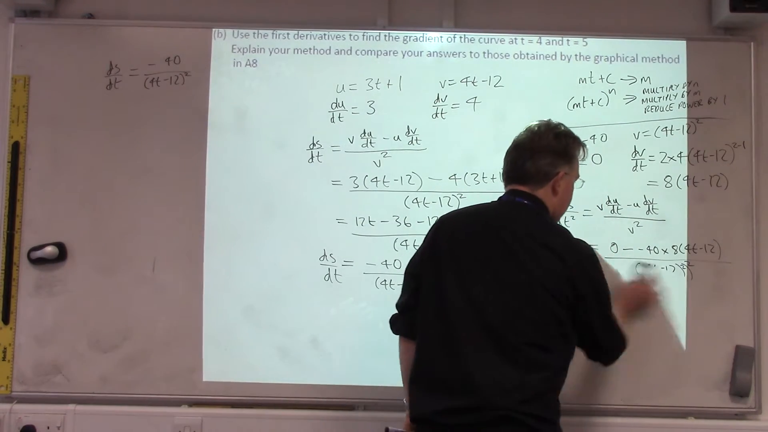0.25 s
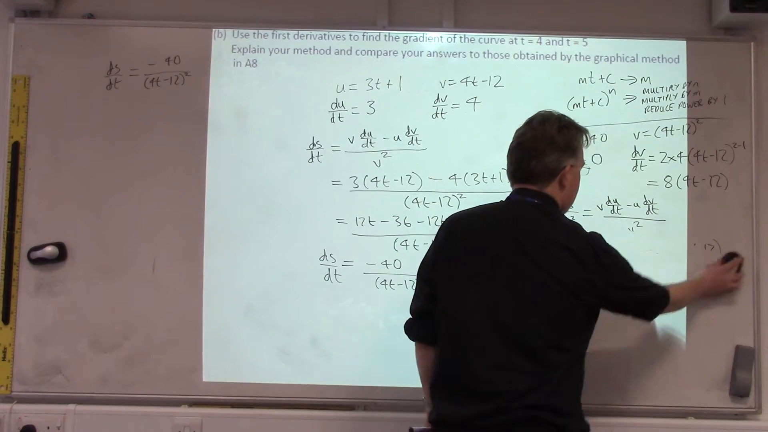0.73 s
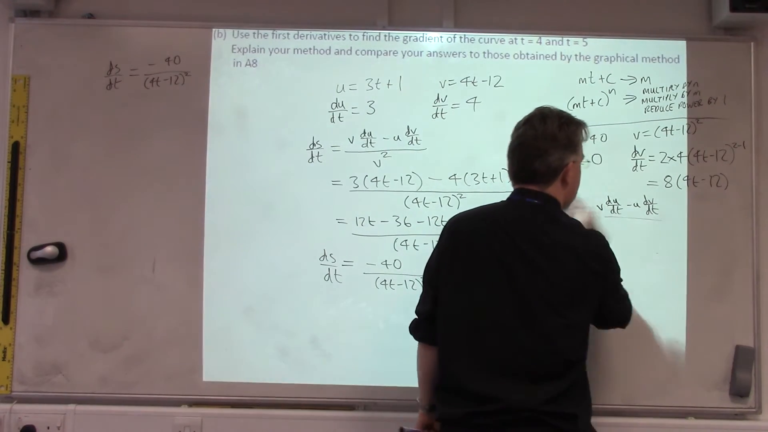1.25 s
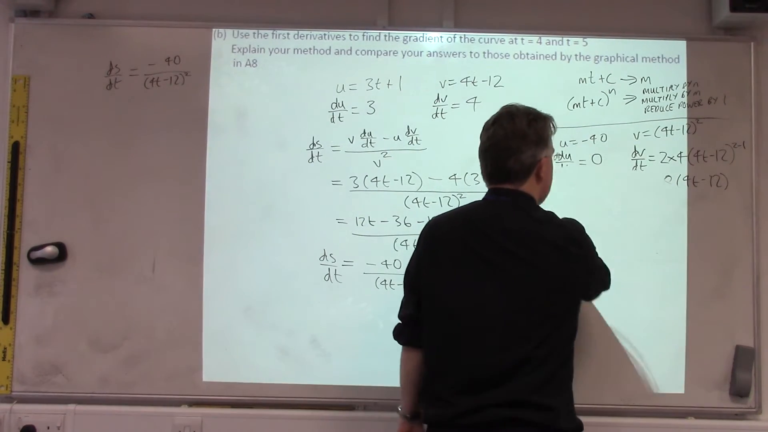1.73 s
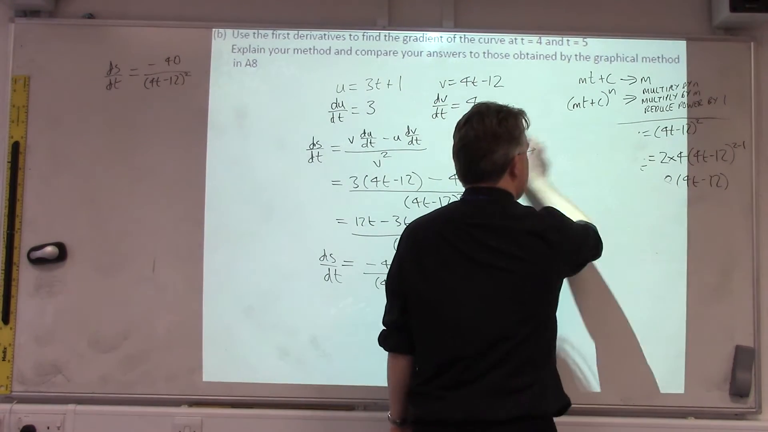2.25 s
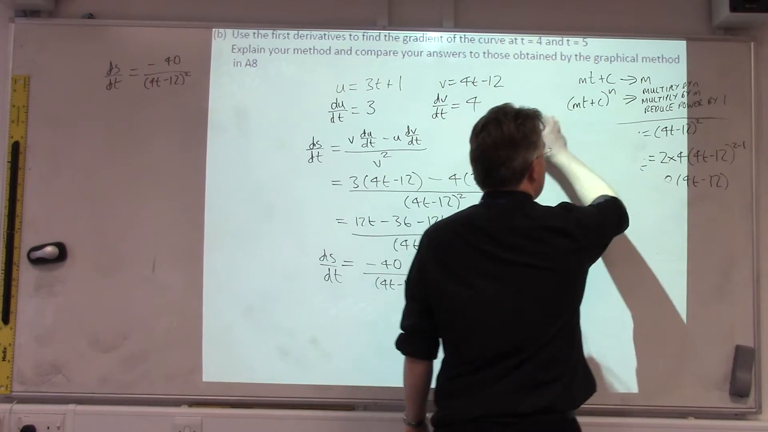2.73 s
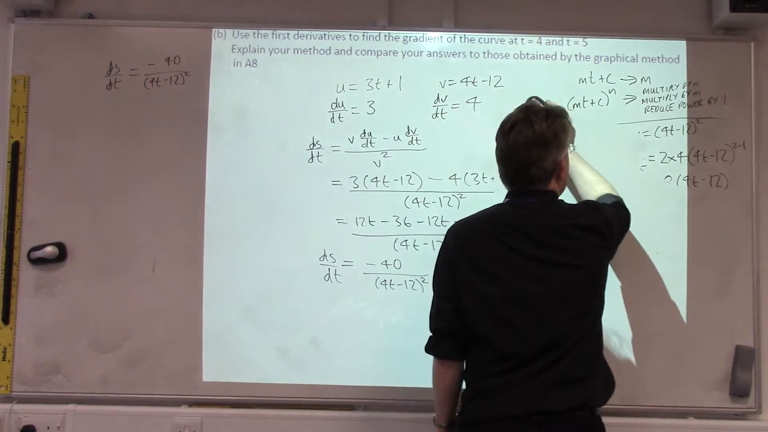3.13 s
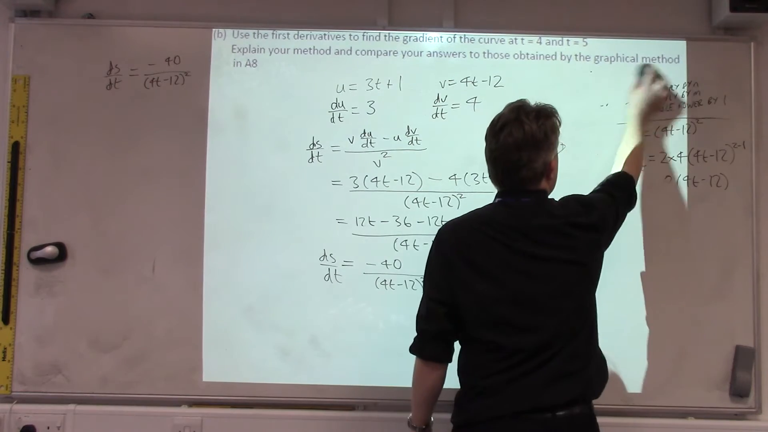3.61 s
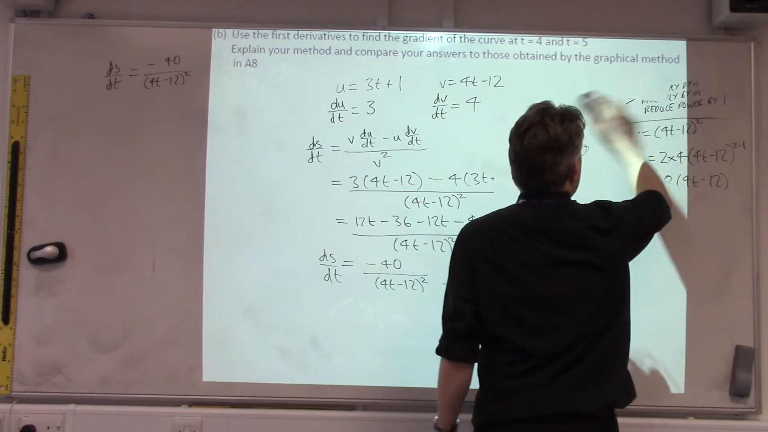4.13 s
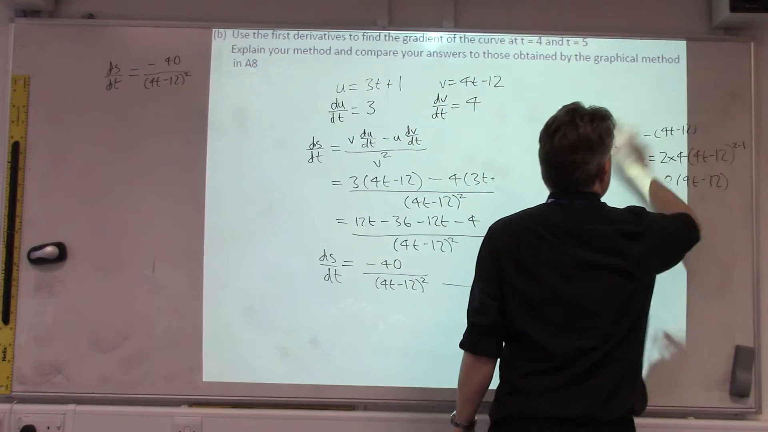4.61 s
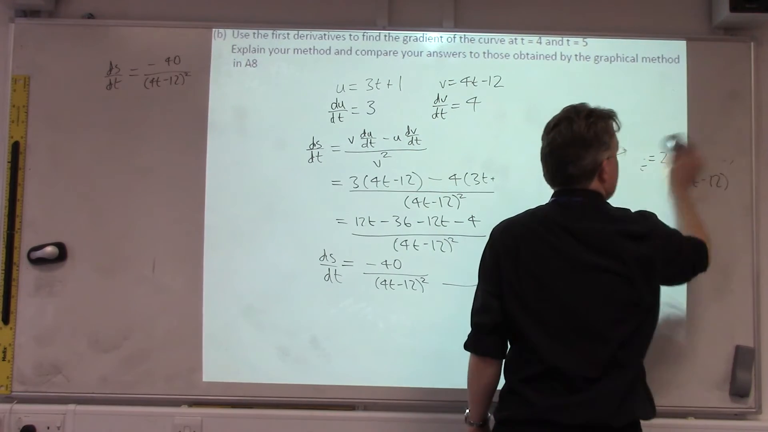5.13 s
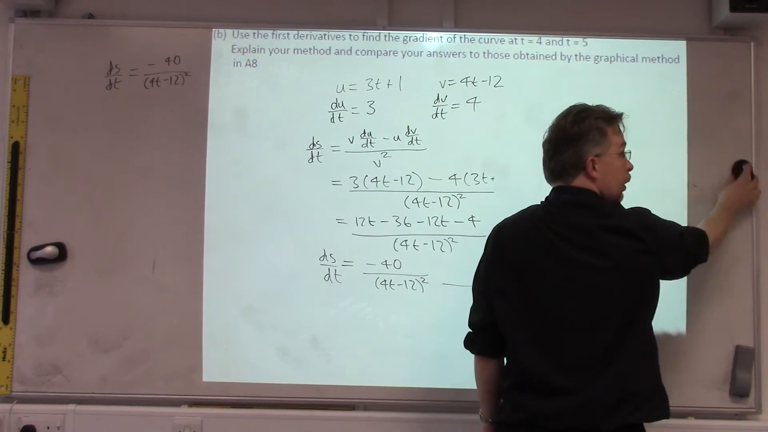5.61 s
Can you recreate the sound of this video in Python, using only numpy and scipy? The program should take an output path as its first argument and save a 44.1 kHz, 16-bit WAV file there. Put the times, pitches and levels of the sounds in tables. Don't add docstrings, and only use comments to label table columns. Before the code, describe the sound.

Quick, airy swishes of an eraser on a loose board in a classroom, low panel rumble beneath, and two small clacks against the surface.

```python
import sys
import numpy as np
from scipy import signal
from scipy.fft import rfft, irfft
from scipy.io import wavfile
from scipy.ndimage import uniform_filter1d

SR = 44100
rng = np.random.default_rng(int(sys.argv[2]) if len(sys.argv) > 2 else 0)


def unload_audio(sound):
    columns = np.transpose(np.atleast_2d(sound))
    steps = np.round(np.clip(columns, -1, 1) * 32767)
    wavfile.write(sys.argv[1], SR, steps.astype(np.int16))


def level_to_linear(level):
    exponent = np.asarray(level, float) / 20
    return 10 ** exponent


N = 258426


def evened(x):
    return x / np.sqrt(np.mean(x ** 2) + 1e-20)


def read(points, hz):
    f, value = np.transpose(points)
    return np.interp(np.log(hz + 1), np.log(f + 1), value)


def curves(rows):
    s, *columns = np.transpose(rows)
    return [np.interp(np.arange(N) / SR, s, column) for column in columns]


def add(mix, s, sound):
    part = mix[round(s * SR):][:len(sound)]
    part += sound[:len(part)]


def resonate(x, hz, width):
    turn = np.exp(2j * np.pi * np.cumsum(hz * np.ones(len(x))) / SR)
    r = np.exp(-np.pi * width / SR)
    return 2 * (turn * signal.lfilter([1 - r], [1, -r], x / turn)).real


def resonate_twice(x, hz, width):
    return resonate(resonate(x, hz, width), hz, width)


def drift(seconds):
    size = int(seconds * SR) + 1
    return evened(uniform_filter1d(uniform_filter1d(rng.standard_normal(N), size), size))


def noise(spectrum, patchy_db):
    hz = np.fft.rfftfreq(1024, 1 / SR)
    real, imag, patches = rng.standard_normal((N // 256 + 5, 513, 3)).T
    patches = uniform_filter1d(patches, size=8, axis=0)
    patches = evened(uniform_filter1d(patches, size=12, axis=1))
    z = (real + 1j * imag) * level_to_linear(read(spectrum, hz)[:, None] + patchy_db * patches)
    return evened(signal.istft(z, nperseg=1024, noverlap=768)[1][:N])


# f/Hz, level/(dB per Hz)
AIR = [(18, -50), (30, -17), (108, -25.5), (208, -1.5), (284, 2.5), (444, -3.5), (519, -1), (710, -8.5),
       (899, -9.5), (2080, -16), (2430, -17.5), (4100, -26), (6390, -29), (10800, -39.5), (15600, -55.5)]
# multiple of the blade rate, level/dB
BLADE = [(2, -66), (3, -72), (5, -77), (6, -74), (8, -75)]
# f/Hz, width/Hz, level/dB
WHISTLES = [(525, 12, -59.5), (1223, 5, -73), (1394, 25, -74), (2435, 4, -77), (2583, 4, -76)]


def projector():
    blade_hz = 295.3
    turn = 2 * np.pi * np.cumsum(blade_hz * (1 + 0.001372 * drift(0.402))) / SR
    blades = np.zeros(N)
    for k, db in BLADE:
        blades += np.sqrt(2) * level_to_linear(db + 2.5 + 2.05 * drift(0.22)) * np.sin(k * turn)
    hiss = rng.standard_normal(N)
    whistles = sum(level_to_linear(db) * evened(resonate_twice(hiss, hz, w)) for hz, w, db in WHISTLES)
    return level_to_linear(-48.5) * noise(AIR, patchy_db=1.32) + blades + whistles


# t/s, low f/Hz, high f/Hz, level/dB
SIDE_BURSTS = [(0.633, 4600, 5700, -66.0), (0.868, 8200, 9700, -73.0), (1.074, 13700, 15600, -86.0),
               (1.263, 13000, 14500, -84.0), (1.588, 8900, 11100, -68.0), (1.588, 14400, 15600, -91.0),
               (1.985, 6800, 9000, -68.0), (2.168, 5600, 7700, -65.0), (2.261, 5700, 7000, -68.0),
               (2.261, 9600, 11100, -71.0), (2.775, 5100, 6400, -70.0), (2.775, 6800, 8400, -73.0),
               (3.866, 5100, 6900, -64.0), (3.86, 11000, 12500, -76.0), (4.214, 10300, 11800, -73.0),
               (5.346, 4200, 5200, -75.0)]


def side_bursts():
    side, hz = np.zeros(N), np.fft.rfftfreq(2048, 1 / SR)
    bursts = rng.standard_normal((len(SIDE_BURSTS), 2048))
    for (s, low, high, db), burst in zip(SIDE_BURSTS, bursts):
        band = evened(irfft(rfft(burst) * (hz > low) * (hz < high)))
        add(side, s - 1024 / SR, level_to_linear(db + 2.5) * band * np.hanning(2048) ** 1.5)
    return np.array([side, -side])


# f/Hz, t60/s
ROOM = [(150, 0.77), (1000, 0.46), (4000, 0.21), (12000, 0.15)]


def classroom(x):
    taps = np.zeros(SR)
    at = np.arange(200, SR - 20, 20)
    taps[at + rng.integers(0, 20, len(at))] = rng.choice([-1., 1.], len(at))
    hz, t, z = signal.stft(taps, SR, nperseg=256)
    decay = level_to_linear(-60 * t / read(ROOM, hz)[:, None])
    tail = signal.istft(z * decay, SR, nperseg=256)[1]
    return signal.fftconvolve(x, tail / np.linalg.norm(tail))[:N]


# t/s, length/s, effort/dB, share of the stroke at top speed, panel share/dB
STROKES = [(-.13, .29, -54.5, 0.55, 2.5), (0.164, 0.31, -56, 0.38, 3), (0.48, 0.34, -56.5, 0.55, 2.5),
           (0.812, 0.37, -57, 0.48, 2.5), (1.178, 0.29, -56, 0.75, 2.5), (1.491, 0.28, -56, 0.48, 3),
           (1.776, .266, -57.5, 0.68, 4), (2.061, 0.36, -56.5, 0.37, 3.5), (2.428, 0.31, -65, 0.38, 4.5),
           (2.636, 0.28, -62.5, 0.62, 6), (3.393, 0.32, -57, .55, 3.5), (3.731, 0.32, -57, 0.42, 3.5),
           (4.047, .38, -57.5, 0.46, 3), (4.44, 0.31, -59, 0.57, 4), (4.727, 0.31, -58, 0.48, 3),
           (5.029, .33, -59, 0.41, 2.5), (5.35, 0.33, -59.5, 0.56, 3), (5.676, 0.49, -55.5, 0.69, 1)]


def sweep():
    overrun_s = 0.019
    t = np.arange(N) / SR
    rub, panel, dust = level_to_linear(-81.5), level_to_linear(-75), level_to_linear(-79)
    for s, length, db, fastest, panel_db in STROKES:
        moments = [s - overrun_s, s + fastest * length, s + length + overrun_s]
        arch = abs(np.sin(np.interp(t, moments, [0, np.pi / 2, np.pi])))
        rub = rub + level_to_linear(db) * arch ** 1.1
        panel = panel + level_to_linear(db + panel_db) * arch ** 0.94
        dust = dust + level_to_linear(db - 14) * arch ** 1.6
    return 20 * np.log10([rub, panel / rub, dust / rub])


# f/Hz, level/(dB per Hz)
RUMBLE = [(60, -35), (110, -6.5), (160, 4), (240, 5), (330, -20.5), (500, -41.5)]
# f/Hz, level/(dB per Hz)
DRAG = [(400, -25.5), (800, 2.5), (1200, -0.5), (1700, -5), (2200, -9.5), (3000, -10.5), (4000, -40)]
# t/s, lean level/dB, deep sway share/dB
LEAN = [(0, -42.5, -17), (.15, -40, -14), (.4, -48, -14), (.65, -55, -20), (.8, -49, -10), (1.13, -49, -20),
        (1.5, -47, -15), (1.9, -51, -9.5), (2.2, -48, -5), (2.65, -54.5, -10), (3.0, -49.5, -17),
        (3.38, -55, -12), (3.6, -58, -9), (4.1, -51, -15), (4.6, -58.5, -15), (5.03, -53, -9),
        (5.4, -56, -7), (5.86, -59, -3)]
# t/s, level/dB, length/s
SCRAPES = [
    (0.12, -60, 0.044),
    (1.38, -54, 0.042),
    (2.502, -47, 0.042),
    (2.675, -46.5, 0.017),
    (3.015, -49, 0.071),
    (3.8, -53, 0.091),
    (4.988, -41.5, 0.031),
]


def flexing():
    lean_db, sway_db = curves(LEAN)
    effort_db, t = sweep()[0], np.arange(N) / SR
    rumble = level_to_linear(lean_db - 8.0 + 1.56 * drift(0.12)) * noise(RUMBLE, patchy_db=1.5)
    sway = evened(resonate_twice(rng.standard_normal(N), 72, 50))
    drag = level_to_linear(-56.5 + 0.22 * (lean_db + 59) + 0.16 * (effort_db - effort_db.mean()))
    scrapes = sum(level_to_linear(2 * db) * np.exp(-((t - s) / length) ** 2) for s, db, length in SCRAPES)
    drag = np.sqrt(drag ** 2 + scrapes)
    dragging = drag * level_to_linear(-5.5 + 1.0 * drift(0.02)) * noise(DRAG, patchy_db=1.0)
    return rumble + level_to_linear(lean_db + sway_db - 6.5) * sway + dragging


# t/s, level/dB, length/s, f/Hz, width/Hz
SMEARS = [
    (1.374, -59, .06, 3200, 1600),
    (1.635, -60, .04, 2600, 800),
    (2.5, -61, .04, 1310, 900),
    (3.0, -56.5, 0.046, 1700, 895),
    (3.57, -59.5, .06, 3320, 1500),
]


def smears():
    t, hiss = np.arange(N) / SR, rng.standard_normal(N)
    out = np.zeros(N)
    for s, db, length, hz, width in SMEARS:
        swell = np.exp(-((t - s) / length) ** 2 / 2)
        out += level_to_linear(db) * swell * evened(resonate_twice(hiss, hz, width))
    return out


# t/s, level/dB, f/Hz, width/Hz, length/s
TICKS = [(2.6605, -40, 1870, 500, .004), (2.661, -45, 6300, 1500, .003), (2.6625, -37, 2600, 2200, .004),
         (2.6947, -31, 950, 900, .004), (2.699, -36, 800, 600, .008), (2.722, -40, 700, 600, .004),
         (2.737, -39, 700, 600, .004), (2.9357, -46, 1430, 700, .003), (3.7385, -45, 3900, 600, .004),
         (3.741, -52, 5600, 1500, .014), (4.9618, -32.5, 1300, 800, .006), (4.964, -46, 6500, 1200, .005),
         (4.966, -35, 3100, 1800, .005), (4.967, -34, 800, 300, .008), (4.973, -35, 2600, 900, .006),
         (4.9805, -29, 900, 1300, .001), (4.972, -42, 1700, 2000, .012), (2.663, -36, 700, 700, .01),
         (4.963, -52, 10500, 4000, .005), (4.969, -43, 4000, 1200, .005), (2.664, -45, 4200, 2000, .005)]


def ticks():
    out, t = np.zeros(N), np.arange(2500) / SR
    bursts = rng.standard_normal((len(TICKS), 2500))
    for (s, db, hz, width, length), burst in zip(TICKS, bursts):
        shove = burst * np.exp(-t / length) + 7.5 * signal.unit_impulse(2500)
        tick = resonate_twice(shove, hz, width)
        add(out, s, level_to_linear(db) * tick / abs(tick).max())
    return out


# f/Hz, level/dB, t60/s
PANEL = [(110, -18, .5), (165, -14, .4), (231, 0, .8), (273, -6, .6), (330, -16, .15), (410, -15, .15),
         (520, -20, .1), (730, -15, .12), (840, -14, .2), (1070, -19, .1), (1330, -20, .12),
         (2500, -26, .1)]
# t/s, level/dB, pitch factor by place struck, time until muted/s
BLOWS = [(0.026, -48.5, 1.2, 0.055), (0.124, -49, 0.68, 0.019), (0.682, -44.5, 0.99, 0.068),
         (1.07, -52, 0.58, 0.053), (1.64, -50.5, 0.69, 0.093), (2.151, -40, 0.66, 0.008),
         (2.203, -48, 0.78, 0.014), (2.676, -39.5, 0.65, 0.012), (2.721, -40, 1.3, 0.0061),
         (2.773, -43, 0.81, 0.012), (4.727, -58, 1.7, 0.026), (5.049, -49, 0.62, 0.2)]
KNOCKS = [
    (2.658, -36, 1.05, .016),
    (2.693, -40, 1.3, .016),
    (4.9675, -31, 1., .066),
]


def knocks():
    out, t = np.zeros(N), np.arange(SR // 4) / SR
    for s, db, pitch, muted in BLOWS + KNOCKS:
        ring = np.zeros(len(t))
        for k, (hz, mode_db, t60) in enumerate(PANEL):
            sign = (-1) ** k
            build_up = 1 - np.exp(-2 * t * hz)
            ring += sign * level_to_linear(mode_db - 60 * t / t60) * build_up * np.sin(2 * np.pi * hz * pitch * t)
        add(out, s, level_to_linear(db - 530 * np.maximum(t - muted, 0)) * ring)
    return out


# f/Hz, width/Hz, level/dB
FELT_PEAKS = [(2450, 1290, 2), (3630, 1760, 1), (5980, 3580, 6), (10020, 3840, 1.5), (12550, 4300, 0)]


def eraser():
    effort_db, panel_db, dust_db = sweep()
    slip_db = 2.0 * np.minimum(rng.exponential(1, N), 5) + 0.53 * drift(0.02)
    slips = rng.standard_normal(N) * level_to_linear(slip_db)
    speed = level_to_linear(0.0079 * (effort_db - effort_db.mean()))
    bands = [level_to_linear(db) * resonate_twice(slips, f * speed, w) for f, w, db in FELT_PEAKS]
    tilt = level_to_linear(0.7 * drift(0.04))
    panel = evened(bands[0] * tilt - bands[1] / tilt) * level_to_linear(panel_db - 3.0)
    felt = evened(bands[2] - bands[3])
    dust = evened(bands[4]) * level_to_linear(dust_db - 3.5)
    return level_to_linear(effort_db) * (panel + felt + dust)


def scene():
    rub, edge, blows = eraser(), ticks(), knocks()
    echoes = classroom(level_to_linear(-22.5) * rub + level_to_linear(-5.5) * edge + level_to_linear(-18) * blows)
    mono = rub + edge + blows + echoes + flexing() + projector() + smears()
    return np.array([mono, mono])


def low_pass(x):
    return signal.sosfilt(signal.butter(12, 15700, fs=SR, output="sos"), x)


def record(dry):
    heard = signal.sosfilt(signal.butter(2, 55, "highpass", fs=SR, output="sos"), dry)
    heard = heard + level_to_linear(-87.5) * rng.standard_normal(dry.shape) + side_bursts()
    heard = signal.oaconvolve(heard, signal.firwin(255, 16100, fs=SR)[None], "same")
    return low_pass(heard)


dry = scene()
out = record(dry)
unload_audio(out)
```